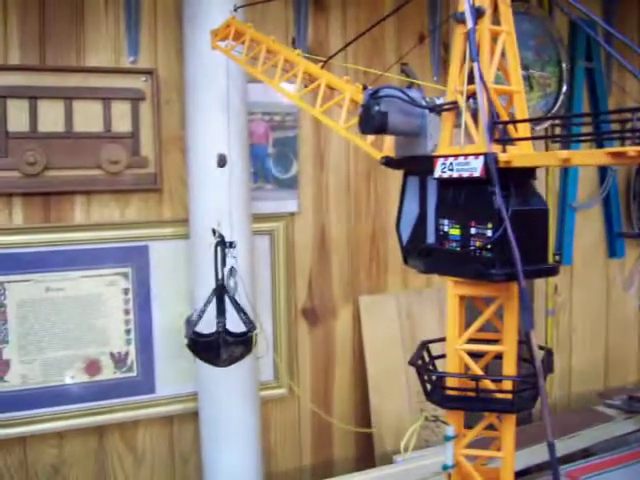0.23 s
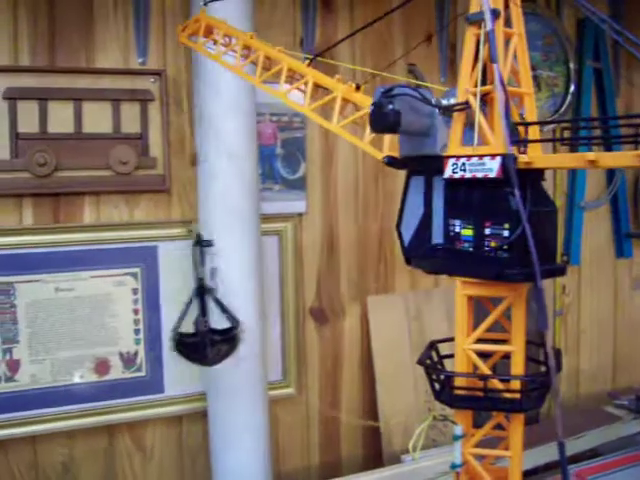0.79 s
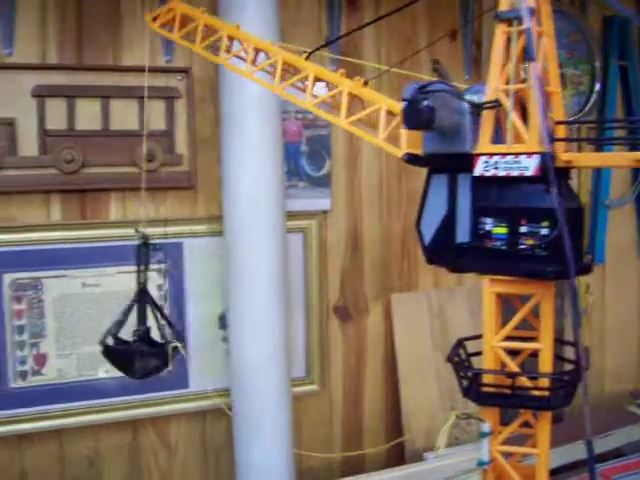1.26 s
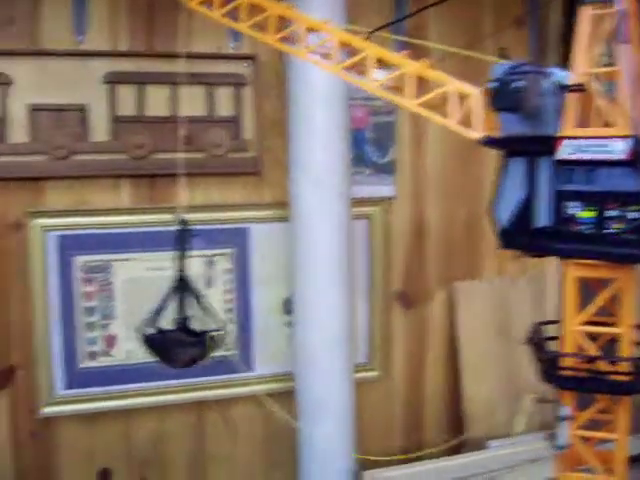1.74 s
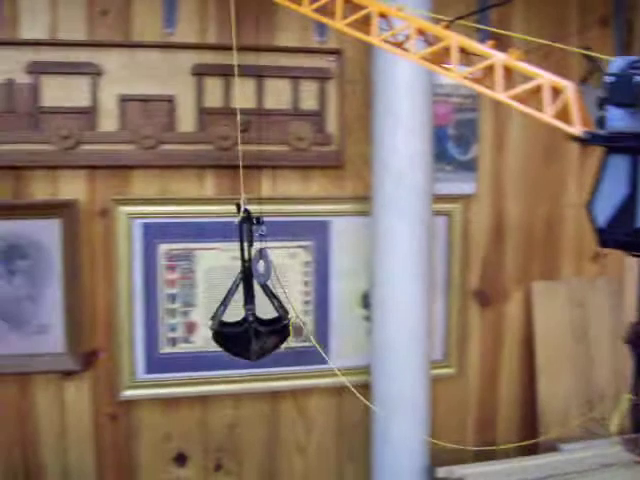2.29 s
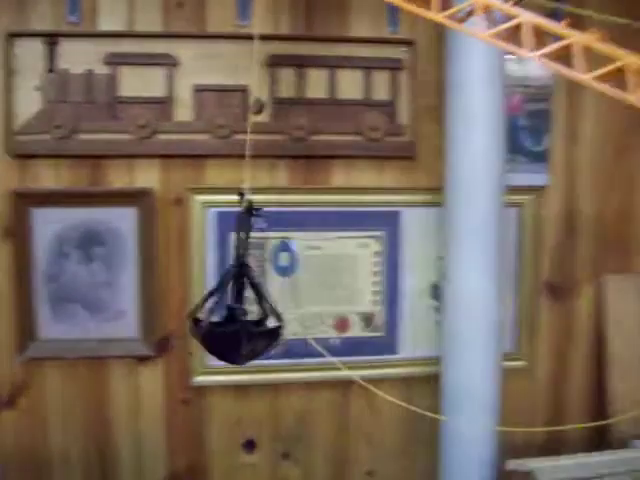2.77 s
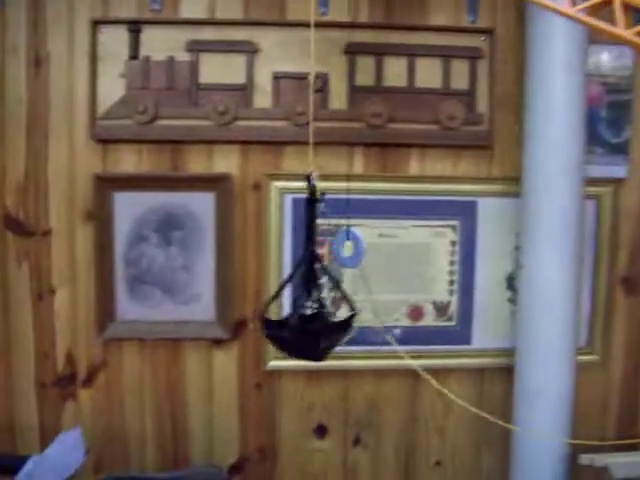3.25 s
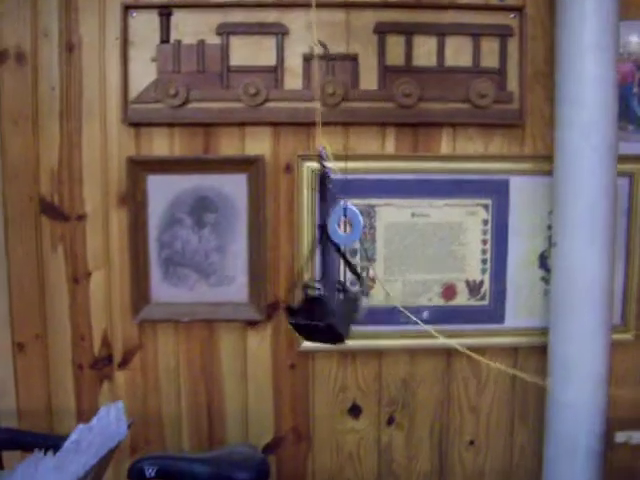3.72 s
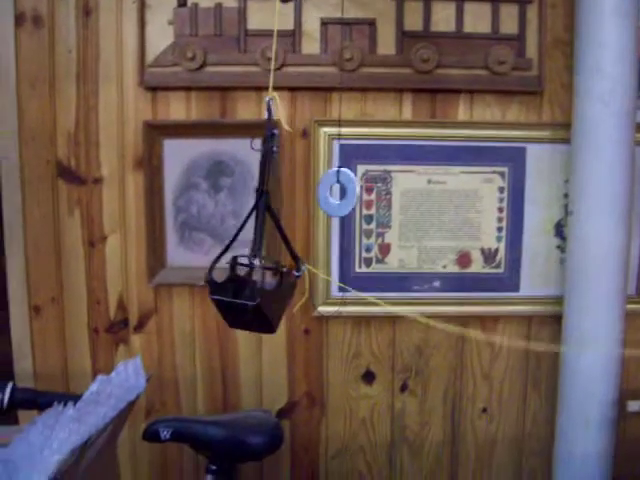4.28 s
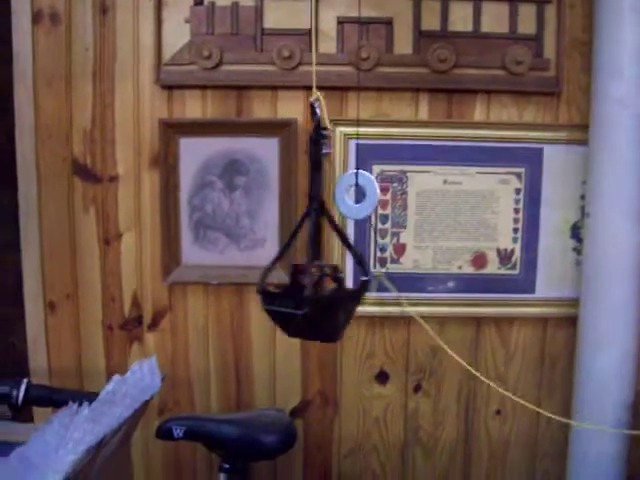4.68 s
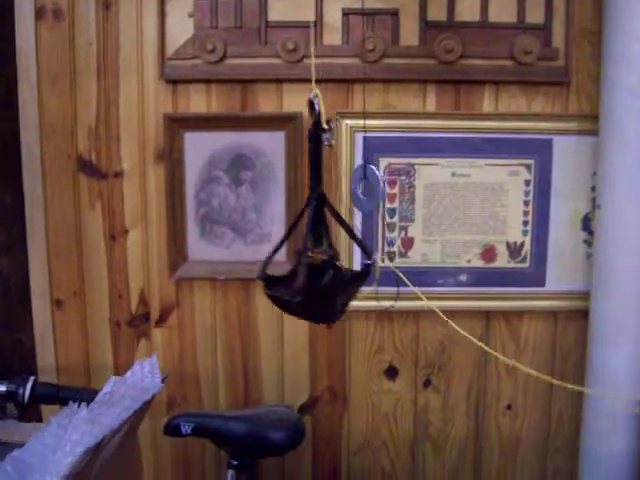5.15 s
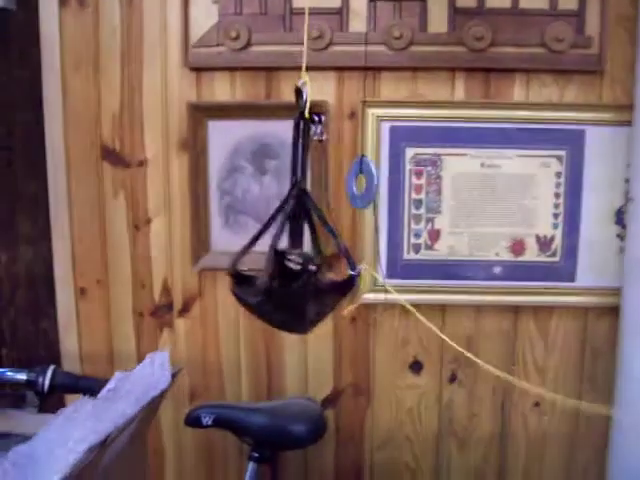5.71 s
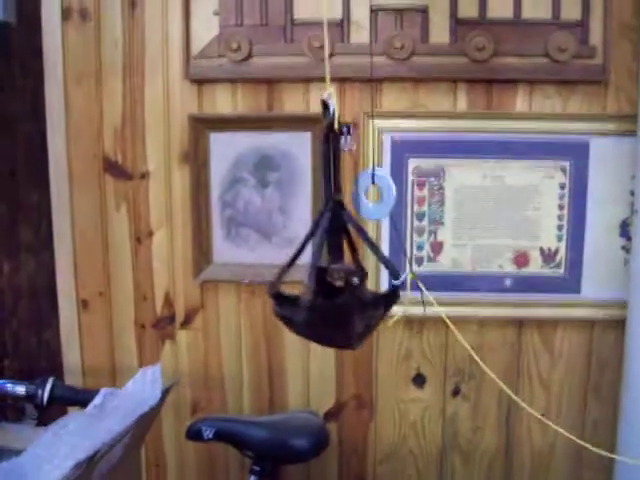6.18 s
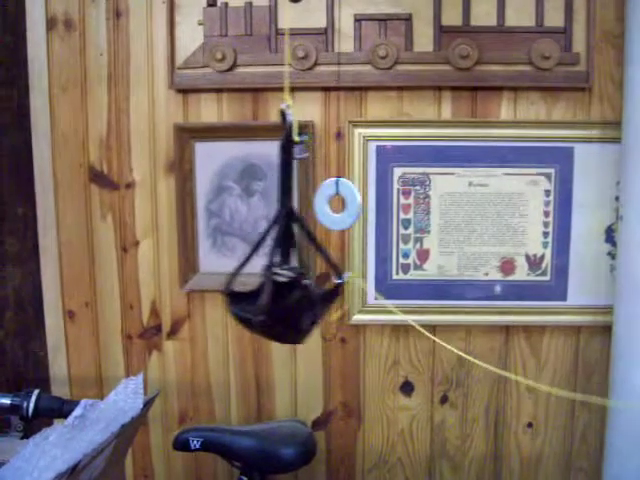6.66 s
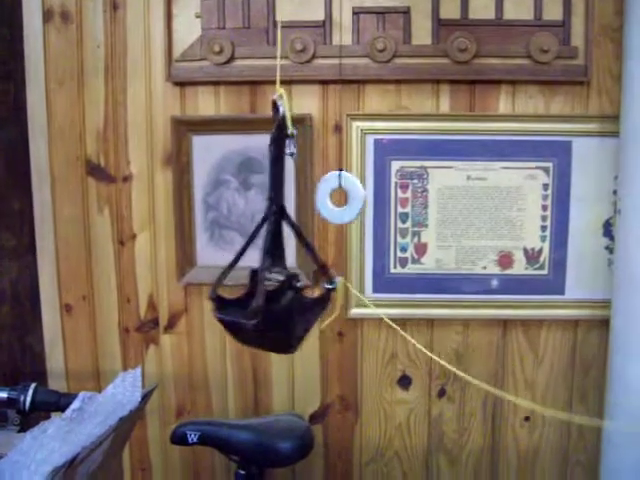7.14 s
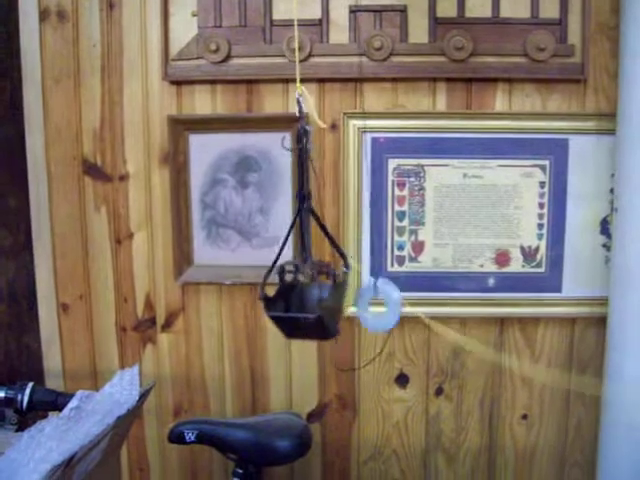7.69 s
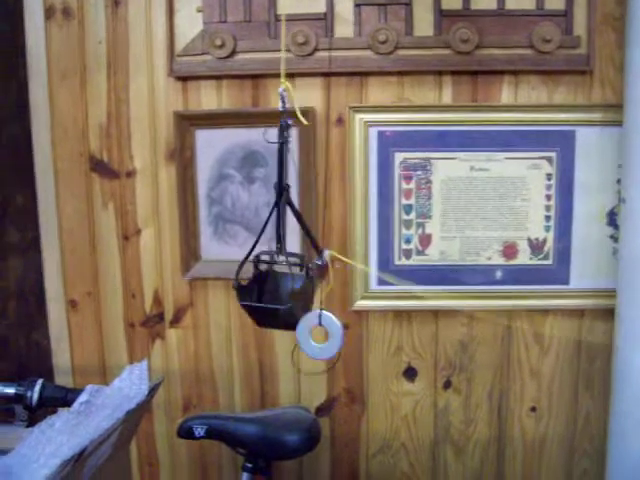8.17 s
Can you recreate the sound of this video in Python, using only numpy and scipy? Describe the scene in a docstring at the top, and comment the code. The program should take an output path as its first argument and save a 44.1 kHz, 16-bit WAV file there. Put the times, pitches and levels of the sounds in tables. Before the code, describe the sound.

In a small wood-panelled room, a toy crane's hoist motor starts at once with a click and whines loudly through plastic gears, its pitch wavering under load, with bouts of knocking and chatter. Near four seconds it winds down over about a second. A quiet pause holds soft room noise, faint ticks and tiny squeaks. A sharp click then starts a short, noisy gear clatter that slows into single clicks. Narrow, slightly muffled small camera microphone.

```python
"""Toy tower crane, wood-panelled room

Small room, one small narrow-band camera microphone. The hoist motor whines through a plastic gearbox as
sweeping shaft orders, labours as the load swings, knocks and chatters when loose, and winds down by friction.
After a pause with a few ticks and faint squeaks, a sharp click starts a second run: slack gear teeth clatter
as noisy strikes, speed up, then coast down into single clicks. Soft noise and a low drone lie behind it all."""
import sys
import numpy as np
from scipy import signal
from scipy.fft import rfft, irfft
from scipy.io import wavfile
from scipy.ndimage import uniform_filter1d

SR = 44100
rng = np.random.default_rng(int(sys.argv[2]) if len(sys.argv) > 2 else 0)


def unload_wav(signal):
    """Save mono or channel-first audio to the path in sys.argv[1] as 16-bit WAV at rate SR, clipped to [-1, 1]."""
    wavfile.write(
        sys.argv[1],
        SR,
        np.round(np.clip(np.atleast_2d(signal).T, -1, 1) * 32767).astype(np.int16),
    )


N = 371630
T = np.arange(N) / SR


def undb(db):
    """Decibels to gain."""
    return 10 ** (np.asarray(db) / 20)


def unit(x):
    """Scale to an rms of one."""
    return x / np.sqrt(np.mean(x ** 2))


def curve(table):
    """The second column of a table as a signal in time, held at both ends."""
    s, values = np.transpose(table)
    return np.interp(T, s, values)


def ramp(start_s, length_s):
    """A straight rise from zero to one."""
    return np.clip((T - start_s) / length_s, 0, 1)


def steady(x, size=3000):
    """Even out the slow level of a vibration to an rms near one."""
    power = uniform_filter1d(uniform_filter1d(x ** 2, size), size)
    floor = 1e-5 * np.mean(x ** 2)
    return x / np.sqrt(np.abs(power) + floor)


def walk(hz):
    """Smooth random wander with an rms of one, drawn anew hz times a second."""
    points = np.interp(T * hz, np.arange(2000), rng.standard_normal(2000))
    return unit(uniform_filter1d(points, int(SR / hz)))


def colour(x, points, size=2048):
    """Causal minimum-phase filter with the given (f/Hz, level/dB) outline."""
    hz, db = np.transpose(points)
    bins_hz = np.arange(size // 2 + 1) * SR / size
    outline = np.interp(np.log(bins_hz + 1), np.log(hz), db)
    # folding the cepstrum makes the response causal
    cepstrum = irfft(np.log(undb(outline)))
    cepstrum[1:size // 2] *= 2
    cepstrum[size // 2 + 1:] = 0
    response = irfft(np.exp(rfft(cepstrum)))
    return signal.oaconvolve(x, response)[:len(x)]


def ring(x, t60, tail_db, size=22050):
    """Direct sound plus a dense tail of reflections that decays by 60 dB in t60 seconds."""
    age = T[:size]
    decay = np.exp(-np.log(1000) * age / t60)
    tail = rng.standard_normal(size) * decay * (1 - np.exp(-age / (t60 / 100)))
    return x + undb(tail_db) * signal.oaconvolve(x, tail / np.linalg.norm(tail))[:N]


def smear(x, t60, tail_db, size=4096):
    """Quick reflections inside the plastic spread a blow in time and keep its broad colour."""
    tail = rng.standard_normal(size) * np.exp(-np.log(1000) * T[:size] / t60)
    response = rfft(signal.unit_impulse(size) + undb(tail_db) * tail / np.linalg.norm(tail))
    broad = np.sqrt(uniform_filter1d(np.abs(response) ** 2, size=7))
    return signal.oaconvolve(x, irfft(response / broad))[:N]


# ringing modes of the plastic gearbox shell: f/Hz, width/Hz, relative level/dB
SHELL_MODES = [(1040, 270, -7), (2230, 360, -3), (2700, 54, -2), (3150, 81, 0), (3530, 64, 0),
               (3720, 40, -2), (3920, 43, -3), (4730, 55, -1), (5720, 97, 0), (6020, 47, -1),
               (6400, 32, -2), (6610, 23, -5)]


def shell(x, ring_db, size=4096):
    """The plastic shell adds its decaying modes to a blow; wider modes die sooner."""
    age = T[:size]
    modes = np.zeros(size)
    for hz, width, db in SHELL_MODES:
        modes += undb(db) * np.sqrt(width) * np.exp(-np.pi * width * age) * np.cos(2 * np.pi * hz * age)
    return x + undb(ring_db) * signal.oaconvolve(x, modes / np.linalg.norm(modes))[:N]


def scrape(cycles, fade, grain_db):
    """Grainy contact noise, renewed at every tooth contact and fading over a share of the cycle."""
    grain = undb(grain_db * rng.standard_normal(N))
    return rng.standard_normal(N) * grain * np.exp(-(cycles % 1) / fade)


def motor_speed(on_s, off_s, free_hz, spin_s, coast_s, drag_hz, loaded_hz=np.inf):
    """The motor spins up as far as its load allows; viscous and dry friction then bring it to rest."""
    spinning_up = free_hz * (1 - np.exp(-np.maximum(T - on_s, 0) / spin_s))
    driven = np.minimum(spinning_up, loaded_hz)
    off_hz = np.interp(off_s, T, driven)
    coasting = (off_hz + drag_hz) * np.exp(-np.maximum(T - off_s, 0) / coast_s) - drag_hz
    return np.where(T < off_s, driven, np.maximum(coasting, 0))


def slowed(hz, knee_hz, octave_db):
    """Level change in dB: a loss of octave_db for every halving of the speed below a knee."""
    return -octave_db * np.log2(np.maximum(knee_hz / (hz + 1e-3), 1))


# colour of the room noise: f/Hz, relative level/dB
ROOM_COLOUR = [(15, -44.5), (25, -13), (75, -9), (108, -16.5), (266, -16), (554, -22.5), (798, -20.5),
               (1100, -19.5), (1700, -26), (2170, -32.5), (7900, -40.5), (8500, -49.5), (11000, -73),
               (18700, -120)]
# low drone in the room, before its waver: t/s, level/dB
DRONE_LEVEL = [(0, -52), (5.7, -54), (6.4, -61.5), (8.43, -83)]
ROOM_DB = -49.5
# faint hiss after the hoist is switched off; its fade (dB a second) runs from the start
HISS_START_S, HISS_RISE_S, HISS_DB, HISS_FADE_DB_PER_S = 4, 0.18, -54.5, 8


def background():
    """Soft room noise, a low drone that wavers in pitch and level, and a faint passing hiss."""
    air = unit(colour(rng.standard_normal(N), ROOM_COLOUR, size=8192)) * undb(ROOM_DB + 0.73 * walk(27))
    drone_cycles = np.cumsum(74 + 4 * walk(28)) / SR
    drone_gain = undb(curve(DRONE_LEVEL) + 2.7 * walk(9.8))
    drone = np.sqrt(2) * np.sin(2 * np.pi * drone_cycles) * drone_gain
    hiss_colour = [(2000, -20.0), (4400, -2.0), (5200, 0.0), (6200, -4), (8000, -24.0)]
    hiss = unit(colour(rng.standard_normal(N), hiss_colour))
    fade_db = HISS_FADE_DB_PER_S * np.maximum(T - HISS_START_S, 0)
    swell = ramp(HISS_START_S, HISS_RISE_S) * undb(HISS_DB - fade_db)
    return air + drone + hiss * swell


# thin squeaks while the bucket hangs and turns, before waver and room:
# middle t/s, f/Hz at the middle, glide/Hz a second, level/dB
SQUEAKS = [(6.41, 2050, 2700, -57), (6.57, 2230, -2000, -63), (6.81, 1950, -2200, -58),
           (6.97, 1940, -2000, -62)]
SQUEAK_S = 0.02  # half length


def squeaks():
    """Short gliding tones under a bell-shaped swell, barely above the room."""
    out = np.zeros(N)
    for s, hz, glide, db in SQUEAKS:
        age = T - s
        tone = np.sqrt(2) * np.sin(2 * np.pi * (hz + glide * age / 2) * age)
        out += undb(db) * np.exp(-(age / SQUEAK_S) ** 2) * tone
    return ring(out * undb(2.5 * walk(42)), t60=.25, tail_db=-15.0)


# low bumps of the jib: t/s, starting level/dB, f/Hz
JIB_BUMPS = [(5.75, -46, 185), (7.186, -36, 208), (8.262, -42.5, 201), (8.331, -41, 70.5)]


def bumps():
    """The jib nods with a low, short ring: a sine that decays from each start."""
    out = np.zeros(N)
    for s, db, hz in JIB_BUMPS:
        age = np.maximum(T - s, 0)
        out += undb(db) * np.exp(-age / 0.028) * np.sin(2 * np.pi * hz * age)
    return out


# clicks of the drive taking up and letting go: t/s, peak level/dB before shell and room, nominal f/Hz
DRIVE_CLICKS = [(0.003, -12, 5400), (0.0094, -19.5, 5000), (4.8628, -32.5, 3420), (5.334, -44, 4530),
                (5.843, -41.5, 3950), (7.02, -45, 1050), (7.1837, -8.5, 6410), (7.1897, -23, 4800),
                (7.193, -19, 4800)]


def clicks(size=4096):
    """Short cracks in the plastic: fast-decaying noise, each coloured around its own pitch."""
    out = np.zeros(N + size)
    age = T[:size]
    decay = np.exp(-age / 0.0013) + 0.032 * np.exp(-age / 0.0099)
    for s, db, hz in DRIVE_CLICKS:
        crack = rng.standard_normal(size) * (1 - np.exp(-age / 0.0011)) * decay
        crack = colour(crack, [(hz / 12, -20), (hz / 2, -9), (hz, 0), (hz * 1.46, -3), (hz * 1.2, -15)])
        start = int(s * SR)
        out[start:start + size] += undb(db) * crack / np.abs(crack).max()
    return ring(shell(out[:N], ring_db=-19.5), t60=0.31, tail_db=-10.0)


# colour of a tooth strike: f/Hz, relative level/dB
STRIKE_COLOUR = [(100, -44), (250, -33.5), (400, -9.5), (620, -22), (820, -9.5), (1050, -2), (1550, -6),
                 (2200, 0), (3100, 2.5), (4200, -1), (5200, -0.5), (5900, 1), (6800, -0.5), (7400, -9.5),
                 (8050, -6.5), (8600, -15.5)]
SLACK_ON_S, SLACK_OFF_S = 7.184, 7.55
# free rate and dry friction (strikes a second), time constants of spin-up and coast (s)
SLACK_FREE_HZ, SLACK_SPIN_S, SLACK_COAST_S, SLACK_DRAG_HZ = 433.3, .113, 0.54, 97.24
# clatter level at speed (dB); it starts weaker (dB) until the play is taken up (s)
CLATTER_DB, TAKE_UP_DB, TAKE_UP_S = -21, -21, 0.069


def slack_gears():
    """Unloaded teeth strike once a cycle, unevenly in force and timing, and rebound in between."""
    hz = motor_speed(SLACK_ON_S, SLACK_OFF_S, SLACK_FREE_HZ, SLACK_SPIN_S, SLACK_COAST_S, SLACK_DRAG_HZ)
    play_db = TAKE_UP_DB * (1 - ramp(SLACK_ON_S, TAKE_UP_S))
    level_db = CLATTER_DB + slowed(hz, knee_hz=121, octave_db=9.5) + play_db
    cycles = np.cumsum(hz) / SR
    at = np.flatnonzero(np.diff(np.floor(cycles)))
    chance = rng.standard_normal((len(at), 2))
    jitter = (.00014 * SR * chance[:, 0]).astype(int)
    blows = np.zeros(N)
    blows[np.clip(at + jitter, 0, N - 1)] = undb(3.6 * chance[:, 1])
    rebounds = steady(scrape(cycles, fade=0.92, grain_db=3))
    force = steady(blows) + undb(2.0) * rebounds
    body = colour(shell(smear(force, t60=0.014, tail_db=6.5), ring_db=-21.5), STRIKE_COLOUR)
    clatter = undb(level_db) * steady(ring(body, t60=0.11, tail_db=-8.5), size=2200)
    # the motor's own hum comes through only near full speed
    hum_tones = np.sin(2 * np.pi * cycles) + undb(1) * np.sin(4 * np.pi * cycles)
    hum = undb(-41.5) * (hz / hz.max()) ** 2.8 * hum_tones
    # slower, heavier strikes also thud in the housing
    thud_db = -46.5 + slowed(hz, knee_hz=55, octave_db=16) - 12 * hz / SLACK_FREE_HZ
    thud_colour = [(150, -22), (290, -4), (390, 2), (470, -10), (600, -31)]
    thud = undb(thud_db) * steady(colour(force, thud_colour))
    return clatter + hum + thud


# orders that the gear train favours or lacks: multiple of the shaft speed, change of level/dB
ORDER_ACCENTS = [(3, -3), (4, -4), (5, -6), (10, -3), (14, 5.5), (17, 2), (18, 4), (19, 3), (22, 5),
                 (26, 3), (28, 1), (32, 3), (34, 4), (36, 4)]


def orders(turns, hz, body, level_db, odd_db, sixth_db, tilt_db, wander_db, count, size=256):
    """Multiples of the shaft speed sweep through the housing's resonances, each swelling on its own."""
    run = np.flatnonzero(hz > 0)
    at = run[::size]  # levels are set at these samples and joined by straight lines
    order = np.arange(2, count)[:, None]
    octave = np.log2(order * hz[at])
    body_hz, body_db = np.transpose(body)
    chance = rng.standard_normal(octave.shape)
    wander = unit(uniform_filter1d(uniform_filter1d(chance, size=31), size=17))
    db = np.interp(octave, np.log2(body_hz), body_db) + tilt_db[at] * octave + wander_db * wander
    db += sum(accent_db * (order == k) for k, accent_db in ORDER_ACCENTS)
    # the two half turns are alike, which weakens odd orders; the commutator switches six times a turn
    gain = undb(db + odd_db[at] * (order % 2) + sixth_db[at] * (order % 6 == 0))
    gain *= undb(level_db[at]) / np.sqrt(np.sum(gain ** 2, axis=0) / 2)
    angle = (2 * np.pi * (turns[run] % 1)).astype(np.float32)
    out = np.zeros(N)
    for k, order_gain in zip(range(2, count), gain):
        phase = 2 * np.pi * rng.random()
        out[run] += np.interp(run, at, order_gain) * np.sin(k * angle + phase)
    return out


# bouts of loose gears: start t/s, start of the fall t/s, lift of the knock level/dB, of the chatter level/dB
LOOSE_BOUTS = [(-0.07, 0.062, 9.5, 5), (0.305, 0.58, 9.5, 8), (0.776, 1.058, 10, 8),
               (1.81, 2.51, 10.5, 8.5), (2.507, 2.68, 9.5, 5.5), (2.765, 3.375, 8.5, 4),
               (3.327, 3.913, 10, 7.5), (3.9, 4.23, 12, 4), (4.273, 4.48, 16, 8.5), (4.638, 4.765, 20, 12)]
BOUT_RISE_S, BOUT_FALL_S = 0.097, .15


def loose_bouts():
    """Lift of the knock and of the chatter in dB: each bout rises, holds and dies away."""
    lifts = []
    for start, end, *lift_db in LOOSE_BOUTS:
        bout = ramp(start, BOUT_RISE_S) * (1 - ramp(end, BOUT_FALL_S))
        lifts.append(np.outer(lift_db, bout))
    return np.max(lifts, axis=0)


HOIST_ON_S, HOIST_OFF_S = 0, 3.878
# hum at twice a turn, before speed loss and waver: t/s, level/dB
HUM_LEVEL = [(0.05, -54), (0.1, -33), (0.29, -45), (0.41, -33.5), (0.56, -38.5), (0.86, -29.5), (1.15, -39),
             (1.54, -27), (1.75, -35), (1.92, -32), (2.32, -29.5), (2.4, -35), (2.62, -28.5), (2.73, -33.5),
             (3.31, -41), (3.43, -37), (3.88, -37)]
# shaft speeds at which the gearbox resonates:
# f/Hz (turns a second), half width/Hz, change of the whine level/dB, of the treble whine level/dB
CRITICAL_SPEEDS = [(164.7, 3.35, 7.5, -3), (170.2, 1.8, 3, -2), (187.3, 4.7, 4.5, -6)]
# the teeth bear more lightly as the shaft slows:
# f/Hz (turns a second), change of the whine level/dB, of the knock level/dB
SLOW_BEARING = [(8, -50, -36), (35, -22, -19), (72, -20.5, -14), (91, -6, -7), (106, 0.5, -2.5),
                (130, 2, -0.5), (160, 0.5, 2)]
# base levels while the gears run tight (dB)
WHINE_DB, TREBLE_DB, KNOCK_DB, CHATTER_DB = -30.5, -35.5, -43.5, -37.5
# share of the chatter's lift in a bout that reaches the whine and the treble whine
WHINE_BOUT_SHARE, TREBLE_BOUT_SHARE = 0.21, .3
# the line comes taut (start and length, s); before that both whines are weaker (dB)
TAUT_S, TAUT_RISE_S, UNLOADED_WHINE_DB = 0.28, 0.019, -3
# under power, the teeth press at least as hard as they do at this speed (turns a second)
STALL_PRESS_HZ = 99
# the microphone turns away from the crane (start and length, s):
# change of the treble whine (dB), of the whine's tilt (dB an octave)
TURN_S, TURN_LENGTH_S, TURN_TREBLE_DB, TURN_TILT_DB = 3, .2, -2.5, 6


def hoist_levels(hz, turned):
    """Levels in dB: the gearbox resonates under load, and all layers sink as the shaft slows."""
    knock_lift, chatter_lift = loose_bouts()
    taut = ramp(TAUT_S, TAUT_RISE_S)
    switched_off = ramp(HOIST_OFF_S, TAUT_RISE_S)
    unloaded_db = UNLOADED_WHINE_DB * (1 - taut)
    resonance = np.zeros((2, N))
    for centre, width, *lift_db in CRITICAL_SPEEDS:
        resonance += np.outer(lift_db, np.exp(-((hz - centre) / width) ** 2))
    whine_lift, treble_lift = taut * (1 - switched_off) * resonance
    speeds, whine_loss, knock_loss = np.transpose(SLOW_BEARING)
    hum = curve(HUM_LEVEL) + slowed(hz, knee_hz=90, octave_db=52) - 2.5 * switched_off
    whine = WHINE_DB + whine_lift + WHINE_BOUT_SHARE * chatter_lift + unloaded_db
    whine += np.interp(hz, speeds, whine_loss)
    treble = TREBLE_DB + treble_lift + TREBLE_BOUT_SHARE * chatter_lift + unloaded_db
    treble += TURN_TREBLE_DB * turned + slowed(hz, knee_hz=128, octave_db=24)
    press = np.where(T < HOIST_OFF_S, np.maximum(hz, STALL_PRESS_HZ), hz)
    knock = KNOCK_DB + knock_lift + np.interp(press, speeds, knock_loss)
    chatter = CHATTER_DB + chatter_lift + slowed(press, knee_hz=185, octave_db=7.0)
    return hum, whine, treble, knock, chatter


def tooth_bearing(hz, turned):
    """At lower speeds odd orders fade, every sixth order stands out and the whine dulls."""
    odd_db = np.interp(hz, [135, 172], [-15, 1])
    sixth_db = np.interp(hz, [55, 105], [12, 1.5])
    tilt_db = TURN_TILT_DB * turned + slowed(hz, knee_hz=115, octave_db=13)
    return odd_db, sixth_db, tilt_db


# speed that the swinging load allows: t/s, f/Hz (turns a second)
LOADED_SPEED = [(0.19, 156.6), (0.25, 159.5), (0.35, 172.6), (0.51, 163.1), (0.57, 168.2), (0.79, 175.8),
                (0.97, 164.8), (1.12, 167.7), (1.45, 184.4), (1.68, 179.2), (1.83, 172.1), (2.48, 170.8),
                (2.56, 175.1), (2.96, 184.6), (3.29, 186.6), (3.53, 192.7), (3.81, 182.2), (3.88, 183.5)]
# how the housing passes each vibration: f/Hz, relative level/dB
WHINE_BODY = [(120, -40), (330, -30), (495, -15), (520, -7), (560, -10), (660, -7), (730, -16), (800, -8),
              (900, -7), (1020, -2.5), (1120, -3.5), (1220, 0), (1310, -0.5), (1430, -3), (1540, -11),
              (1680, -17), (1810, -15), (1950, -26), (2500, -60)]
TREBLE_BODY = [(1300, -48), (1850, -2), (2450, 4), (2850, 2), (3250, 3), (4100, -4.5), (4700, -0.5),
               (5900, -2.5), (6400, -10), (7300, -17), (8500, -35)]
KNOCK_BODY = [(60, -32), (200, -13), (380, -4.5), (600, -12), (800, -7.5), (1050, 1), (1300, 0.5),
              (1520, 2), (1800, -23.5), (2600, -33)]
CHATTER_BODY = [(1200, -38), (1900, 3.5), (2450, 6), (3300, 1.5), (4200, 1), (5000, -3), (5800, -3.5),
                (6500, -2.5), (7300, -15), (8500, -33)]
# free speed and dry friction (turns a second), time constants of spin-up and coast (s)
HOIST_FREE_HZ, HOIST_SPIN_S, HOIST_COAST_S, HOIST_DRAG_HZ = 200, .1, .93, 84.8


def hoist():
    """The loaded gears whine on the orders of the shaft; run loose, they knock and chatter as well."""
    hz = motor_speed(HOIST_ON_S, HOIST_OFF_S, HOIST_FREE_HZ, HOIST_SPIN_S, HOIST_COAST_S, HOIST_DRAG_HZ,
                     curve(LOADED_SPEED))
    turned = ramp(TURN_S, TURN_LENGTH_S)
    hum_db, whine_db, treble_db, knock_db, chatter_db = hoist_levels(hz, turned)
    odd_db, sixth_db, tilt_db = tooth_bearing(hz, turned)
    # loose teeth make the speed flutter and the treble whine brighter
    looseness = undb(chatter_db) / (undb(chatter_db) + undb(treble_db))
    turns = np.cumsum(hz * (1 + .003 * looseness * walk(70))) / SR
    hum = undb(hum_db + 1.64 * walk(25.34)) * np.sqrt(2) * np.sin(4 * np.pi * turns)
    imbalance_db = knock_db - 16 + slowed(hz, knee_hz=194, octave_db=23.5) + 2.5 * walk(23)
    imbalance = undb(imbalance_db) * np.sin(2 * np.pi * turns)
    whine = orders(turns, hz, WHINE_BODY, whine_db + 1.0 * walk(29.66), odd_db, sixth_db, tilt_db,
                   wander_db=4.0, count=40)
    treble = orders(turns, hz, TREBLE_BODY, treble_db + 0.91 * walk(40.72), odd_db - 7 * looseness,
                    sixth_db, 12 * (looseness - .62), wander_db=3.5, count=52)
    knock_force = smear(scrape(turns, fade=0.43, grain_db=8.5), t60=0.056, tail_db=12)
    knock = steady(colour(knock_force, KNOCK_BODY))
    chatter_force = shell(scrape(2 * turns, fade=0.93, grain_db=3), ring_db=-33.0)
    chatter = steady(colour(chatter_force, CHATTER_BODY))
    # the hardest contacts also ring the teeth themselves
    sizzle_colour = [(3800, -31.0), (5000, -4.5), (5700, 4.5), (6300, -11.5), (7200, -33.5)]
    sizzle = steady(colour(scrape(2 * turns, fade=0.14, grain_db=5), sizzle_colour))
    rattle = undb(knock_db - 2.0) * knock + undb(chatter_db - 4.5) * chatter
    rattle += undb(2 * chatter_db + 17) * sizzle
    whines_in_room = ring(whine + undb(2.5) * treble, t60=0.18, tail_db=-4.5)
    return hum + imbalance + whines_in_room + ring(rattle, t60=0.2, tail_db=-0.5)


def scene():
    """The room, the squeaks, bumps and clicks, and both runs of the drive."""
    return (background() + squeaks() + bumps() + clicks() + slack_gears() + hoist())[None]


def record(dry):
    """A small camera microphone with a narrow band: a steep low-pass at 8250 Hz."""
    return signal.sosfilt(signal.cheby1(12, .3, 8250, fs=SR, output="sos"), dry)


dry = scene()
out = record(dry)
unload_wav(out)
```